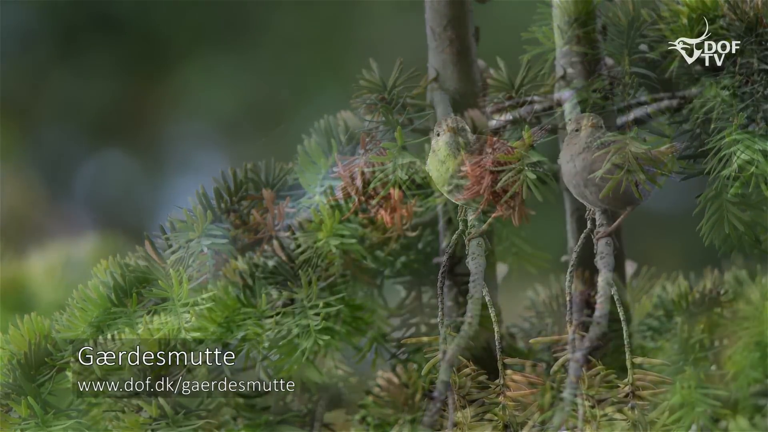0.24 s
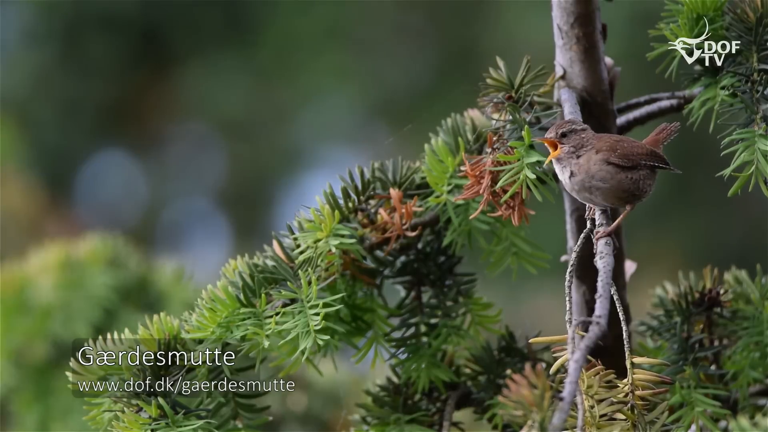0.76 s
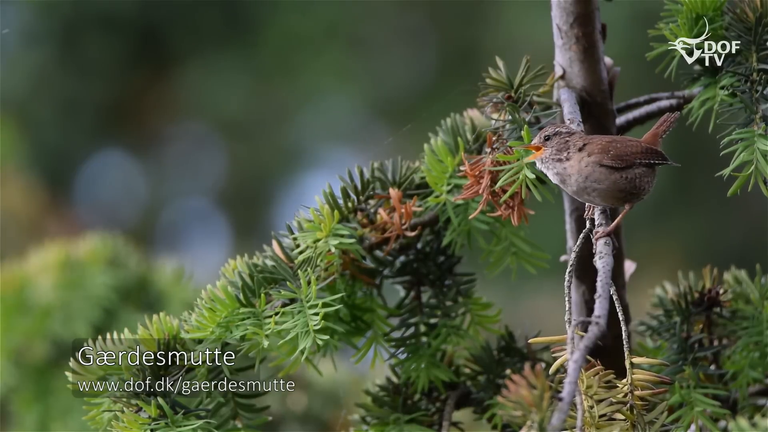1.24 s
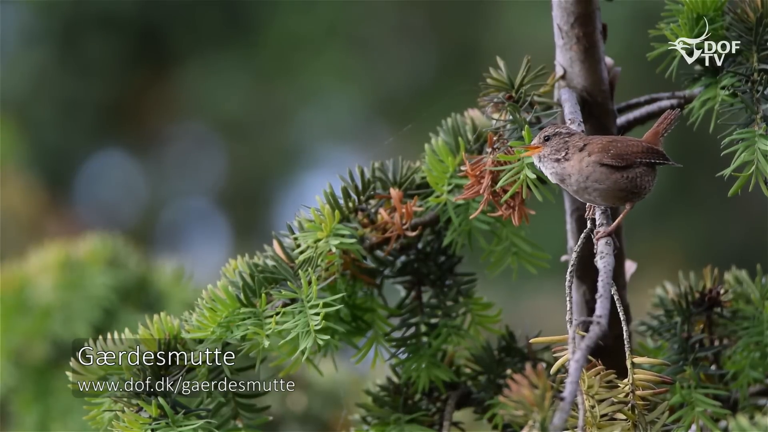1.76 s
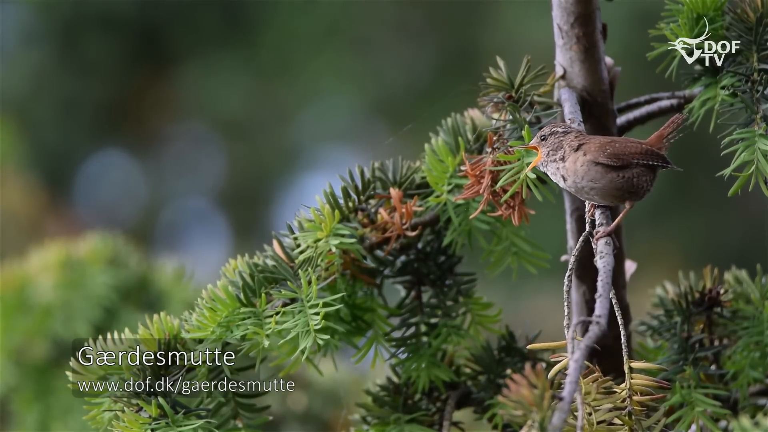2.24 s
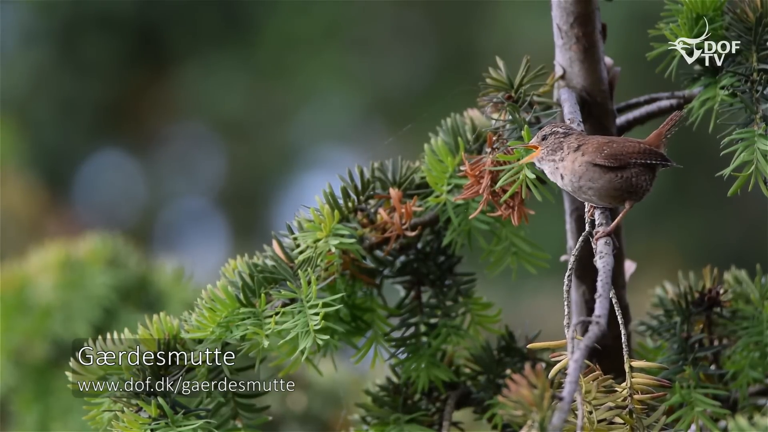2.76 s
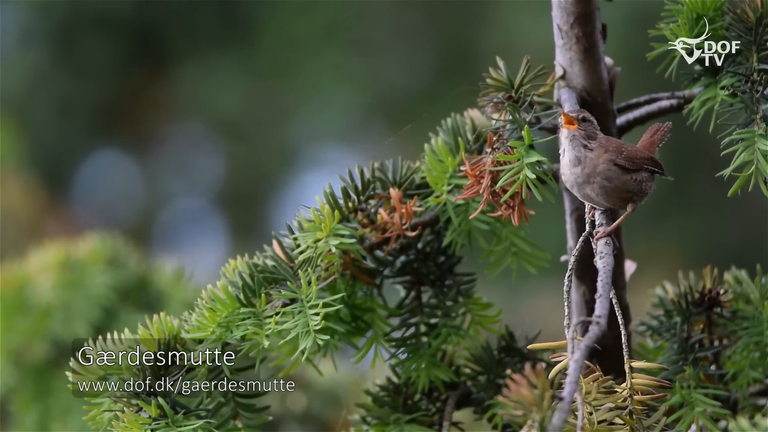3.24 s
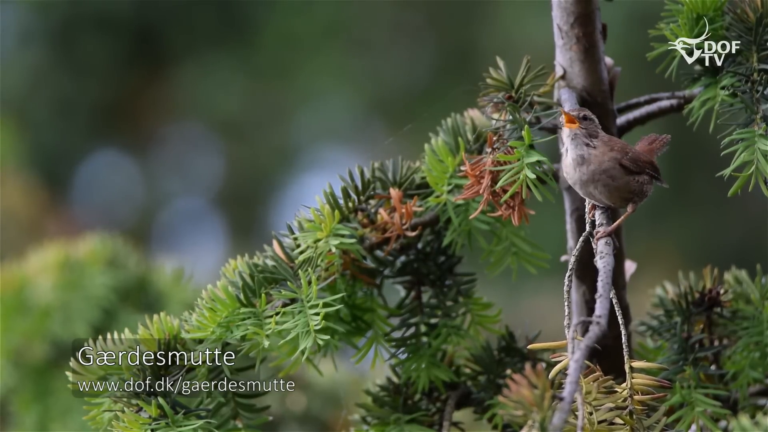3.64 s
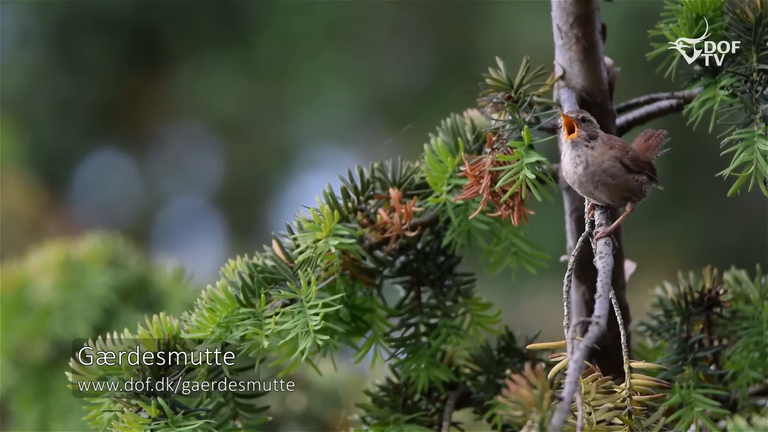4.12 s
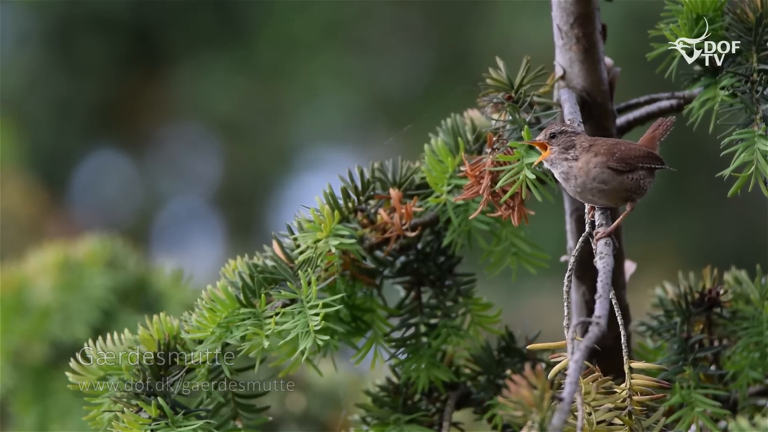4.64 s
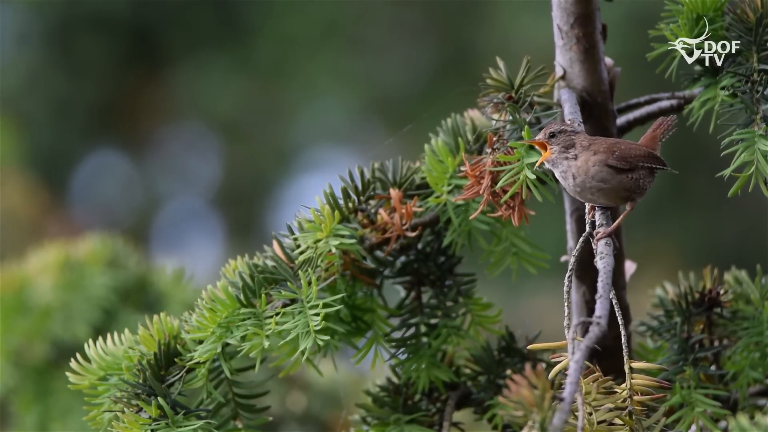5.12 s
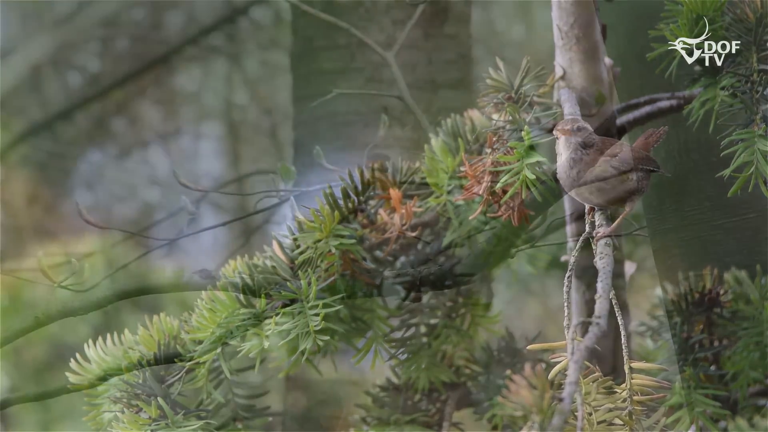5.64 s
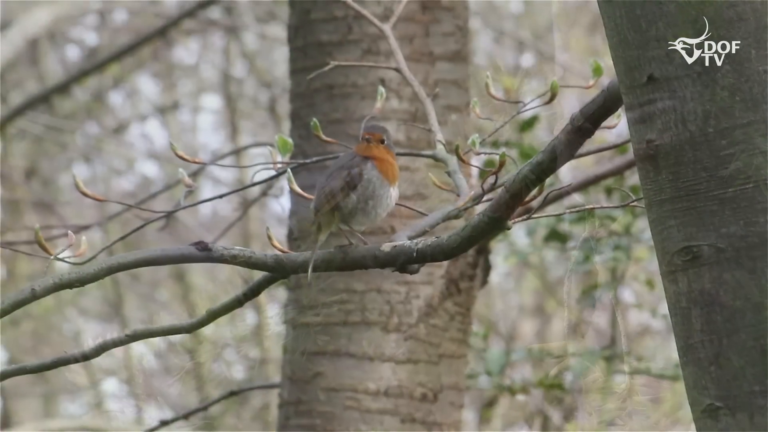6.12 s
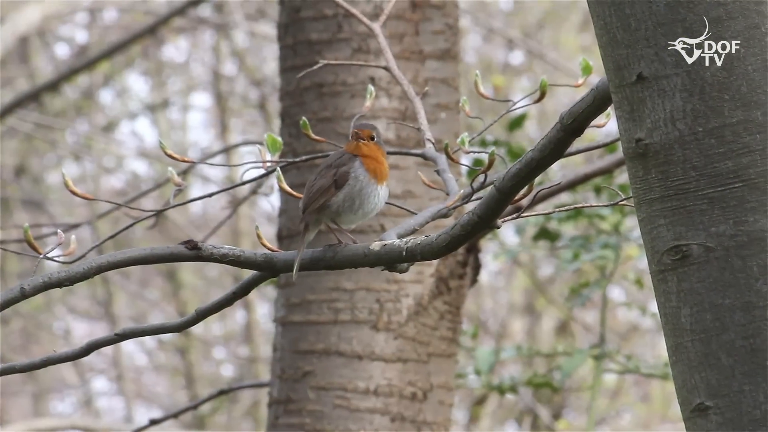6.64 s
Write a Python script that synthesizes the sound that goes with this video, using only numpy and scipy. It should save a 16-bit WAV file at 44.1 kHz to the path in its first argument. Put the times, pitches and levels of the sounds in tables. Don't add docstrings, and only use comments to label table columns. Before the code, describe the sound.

A wren sings loud, piercing whistles, trills and a dry buzz close by in woodland over steady traffic hiss, then a robin takes over.

```python
import sys
import numpy as np
from scipy import signal
from scipy.fft import rfft, irfft, next_fast_len
from scipy.io import wavfile
from scipy.ndimage import uniform_filter1d, minimum_filter1d, map_coordinates

SR = 44100
rng = np.random.default_rng(int(sys.argv[2]) if len(sys.argv) > 2 else 0)


def int16_out(signal):
    q = np.round(np.clip(np.atleast_2d(signal).T, -1, 1) * 32767)
    wavfile.write(sys.argv[1], SR, q.astype(np.int16))


def invert_db(level):
    return 10 ** (np.asarray(level, dtype=float) / 20)


N = 303408
TIME = np.arange(N) / SR

# pitch_hz, level_db (per Hz)
TRAFFIC = [(0, -27.5), (6, -28), (6.76, -33), (6.88, -36)]
TRAFFIC_COLOUR = [(20, -56.5), (50, -16), (140, -15.5), (330, -17), (440, -13.5), (560, -5.5), (900, -1.5),
                  (1700, -6.5), (2300, -13), (3100, -17.5), (4100, -23), (6200, -30.5), (8300, -34.5),
                  (12000, -40.5), (15500, -52.5)]
# pitch_hz, likeness (0 to 1)
ALIKE = [(60, 0.9), (160, 0.97), (420, 1), (1120, 0.98), (3000, 0.86), (8000, 0.39)]
# pitch_hz, level_db (per Hz)
WIND = [(0, -60.5), (3.2, -51.5), (5, -44), (6.05, -40.5), (6.6, -35), (6.88, -33)]
WIND_COLOUR = [(30, -12), (60, -16.5), (150, 0), (300, -3), (600, -7), (1200, -76)]
# pitch_hz, level_db (per Hz)
GUSTS = [(5.7, -70), (6.0, -43), (6.5, -36.5), (6.88, -36.5)]
GUST_COLOUR = [(30, -15), (70, 2.5), (120, -4), (250, -10.5), (500, -37.5)]
# pitch_hz, level_db (per Hz)
LAST_SONG = [(4300, -73), (4700, 5.5), (5800, -2.5), (6300, -60.5)]
# time_s, leaf_db, whine_db
SECOND_PLACE = [(5.5, -74.5, -100), (5.7, -47.5, -90), (5.95, -48.5, -62.5), (6.2, -50, -58.5),
                (6.5, -40, -41.5), (6.88, -28.5, -47)]
# pitch_hz, level_db (per Hz)
LEAF_COLOUR = [(1000, -28), (2500, -11), (6000, -6.5), (10000, -15), (15500, -28.5)]

# pitch_hz, level_db
THROAT = [(7000, -7.5), (8000, -4), (9500, -1), (12500, 1), (14500, -4)]
# time_s, left_minus_right_db
HEAD_TURN = [(.5, .3), (1.5, .9), (2.2, 2.3), (3, .3), (3.8, .5), (4.3, 3), (4.65, -.7), (5.2, -.7),
             (5.6, .6)]
# time_s, level_db
FACING = [(3.73, 0), (3.76, -3.5), (4.16, -4), (4.18, 0)]
# pitch_hz, fade_s (time to fall 60 dB)
FAR_WOOD = [(3000, 0.75), (5000, 0.58), (8000, 0.44), (14000, 0.27)]

# share_of_length, share_of_glide, level_db
HOLD = [(0, 0, -2), (.08, 0.47, -5), (.2, 0.74, -7), (.55, 0.67, -5), (.75, 0.92, -3), (1, 1, -12)]
DART = [(0, 0.05, -13.5), (.6, 0.86, 0.5), (1, 0.97, 3)]
SOAR = [(0, 4, -26), (.015, 2.7, -20), (.027, 1.28, -17), (.04, .64, -10), (.065, .2, -9), (.115, 0, -3),
        (.33, .3, -4), (.5, .5, 0), (.8, .92, -4), (1, 1, -6)]
PLUNGE = [(0, 0, -17), (.17, .15, -7), (.4, .46, 0), (.52, .65, -1), (.66, .83, -7), (1, 1, -9)]
SLIDE = [(0, 0, -8), (.12, .08, -1.5), (.33, .25, 0), (.67, .65, -1.5), (1, 1, -3)]
SAG = [(0, 0, -4), (.25, .56, 0), (.4, .6, -4), (.6, .64, -4), (1, 1, -12)]
BOW = [(0, .4, -15), (.25, .85, -8), (.42, 1, -6), (.7, .62, -3), (1, 0, 0)]
HOOK = [(0, .1, -20), (.09, 0, -6), (.16, .05, -2), (.36, .39, 0), (.65, .77, -4), (.8, .9, -8), (1, 1, -9)]
RISE = [(0, 0, -17), (.22, .2, -12), (.35, .36, -9), (.58, .6, -10), (.72, .76, -1), (.86, .9, -1),
        (1, 1, -5)]
FADE = [(0, 0, -22), (.11, .46, 0), (.3, .8, -4), (.37, .78, -12), (1, 1, -12)]
FALL = [(0, 0, -5), (.1, .12, -2), (.2, .28, -3), (.3, .45, -4), (.4, .6, -5), (.6, .74, -3), (.9, .93, 0),
        (1, 1, -3)]
STALL = [(0, 0, -5), (.17, .18, -1), (.26, .38, -4), (.35, .52, -6), (.45, .61, -5), (.7, .67, -7),
         (.86, .75, -3), (1, 1, -7)]
# start_s, length_s, first_hz, second_hz, level_db
HOLDS = [
    (.18, 0.051, 3740, 3540, -42),
    (0.31, .055, 8350, 8050, -57),
]
DARTS = [
    (0.429, 0.018, 4410, 5710, -33.5),
    (0.721, 0.03, 5970, 4970, -12.5),
    (1.176, 0.017, 3400, 3535, -20.5),
    (4.265, 0.038, 3155, 3410, -17.5),
]
SOARS = [
    (0.812, 0.26, 7836, 7064, -11.5),
]
PLUNGES = [
    (1.118, 0.019, 4830, 3910, -9),
    (1.64, .042, 5730, 3320, -7),
]
SLIDES = [
    (1.251, 0.066, 5283, 4530, -4.5),
    (4.604, 0.082, 5400, 4585, -6),
]
SAGS = [
    (1.41, 0.11, 5004, 4800, -7.5),
]
BOWS = [
    (1.542, 0.048, 3430, 3770, -14),
    (1.847, 0.022, 3160, 3340, -21.5),
    (2.656, 0.025, 3500, 3790, -13),
]
HOOKS = [
    (1.729, 0.083, 7350, 4610, -6.5),
]
RISES = [
    (2.97, .051, 3284, 4117, -5),
    (3.064, .056, 3286, 4120, -5.5),
    (3.156, 0.051, 3250, 4093, -7),
    (3.246, .056, 3283, 3983, -7),
    (3.343, 0.054, 3277, 4090, -6.5),
]
FADES = [
    (3.45, 0.16, 6140, 5630, -4),
]
FALLS = [
    (4.746, .051, 6130, 4855, -4.5),
    (4.867, .049, 5930, 4810, -4),
    (4.981, .049, 5940, 4830, -4.5),
    (5.097, .053, 5920, 4850, -4),
    (5.324, 0.055, 5920, 4810, -5.5),
    (5.556, .051, 5860, 4875, -5),
]
STALLS = [
    (5.21, 0.063, 5920, 4760, -4.5),
    (5.439, 0.063, 5980, 4610, -5),
]
# time_s, pitch_hz, level_db
SOLOS = [
    [(.499, 6400, -45), (.512, 7080, -43), (.519, 6920, -34), (.525, 6500, -24), (.532, 6520, -23)],
    [(.578, 4650, -34), (.59, 4490, -25.5), (.62, 4460, -21), (.635, 4390, -25.5)],
    [(.665, 4500, -31), (.68, 4445, -28), (.705, 4470, -34)],
    [(2.729, 4630, -27.5), (2.745, 4490, -13), (2.765, 4410, -0.5), (2.776, 4340, -10.5),
     (2.787, 4337, -10), (2.826, 4115, -10.5)],
    [(2.868, 6800, -25), (2.875, 7520, -8.5), (2.884, 8110, -6), (2.89, 8320, -7), (2.9, 7820, -9),
     (2.912, 7190, -6.5), (2.917, 7390, -5.5)],
    [(3.632, 4850, -25), (3.655, 4700, -14), (3.668, 4614, -2.5), (3.688, 4434, -2), (3.7, 4210, -9.5),
     (3.724, 4010, -5.5)],
    [(4.181, 6460, -13), (4.19, 7190, -4.5), (4.197, 7380, -14.5), (4.21, 6900, -7.5), (4.222, 6530, -10.5),
     (4.232, 6320, -5)],
    [(4.357, 8760, -17.5), (4.366, 8300, -10), (4.378, 8175, -5.5), (4.425, 8180, -13), (4.465, 8074, -6.5),
     (4.53, 8080, -9), (4.555, 8050, -23.5)],
]
# time_s, pitch_hz, level_db
FAR_BIRD = [
    [(.565, 4060, -43), (.64, 3850, -41)],
    [(.67, 3730, -37), (.685, 3620, -37)],
    [(4.43, 5130, -49), (4.5, 5000, -45), (4.58, 4980, -49)],
]
# time_s (from the start of each), pitch_hz, level_db
FLICK = [(0.0, 3880, -36.5), (0.004, 4910, -15), (0.009, 5360, -14)]
PIPE = [(0, 6400, -14), (.008, 6450, -10), (.024, 6370, -10), (.04, 6210, -12), (.056, 6130, -9),
        (.073, 6100, -9)]
GRACE = [(-.016, 5850, -24), (-.011, 5900, -22)]
BUZZ = [(-.0004, 7700, -21), (.0008, 6950, -12), (.0022, 5950, -12.5), (.0038, 5000, -17),
        (.0048, 4500, -25)]
# start_s, level_change_db
FLICKS = [(1.894, 0), (2.0202, 0.5), (2.149, 1), (2.2747, 0), (2.398, 1), (2.524, 0.5)]
PIPES = [(1.913, 1), (2.0449, -0.24), (2.1687, -1.3), (2.299, -1.4), (2.4202, 0), (2.5463, -2)]
BUZZES = [(3.7605, -2.5), (3.7886, 0), (3.8202, 0), (3.8477, 0), (3.8762, 1), (3.905, 0.5), (3.9345, 0.5),
          (3.9643, 0), (3.994, 1.5), (4.023, 0.5), (4.051, 2), (4.0822, -1), (4.1115, -1.5), (4.14, 0)]

# start_s, knock_db, snap_db
TICKS = [(.397, -47, 4), (6.109, -30, -7), (6.119, -33, -8), (6.1307, -27.5, -8.5), (6.2532, -25.5, -24),
         (6.2682, -35.5, -1), (6.273, -32, -1), (6.2769, -16, -23), (6.294, -27.5, -7), (6.303, -35.5, -3),
         (6.34, -37.5, -4), (6.34, -37, -5), (6.353, -30, -3.5), (6.401, -36.5, 2.5), (6.404, -32, -8.5),
         (6.414, -28.5, -8.5), (6.4144, -44.5, -4), (6.45, -34.5, -9), (6.464, -29.5, -4),
         (6.3057, -47, -19), (6.335, -16, -11.5), (6.35, -20, -27.5), (6.3564, -17.5, -52),
         (6.4073, -21, -20), (6.41, -16, -14), (6.4247, -28.5, -5.5), (6.4296, -8, -24), (6.4372, -12, -22),
         (6.4577, -19, -31), (6.494, -16.5, -38), (6.6003, -19, -31), (6.6624, -13.5, -10),
         (6.673, -16, -32.5), (6.6794, -18.5, -5), (6.686, -8.5, -15), (6.7715, 1.5, -18),
         (6.784, -12.5, -29.5), (6.794, -15.5, -4), (6.792, -21, -27), (6.797, -11.5, -9),
         (6.7987, -9, -10.5), (6.802, -14.5, -17), (6.8053, -5.5, -20), (6.8089, -14, 1)]
# start_s, pitch_hz, peak_db
BILL = [
    (0.813, 7880, -24),
    (1.255, 7000, -9),
    (1.523, 2820, -1),
    (1.5243, 6480, -18),
]
# start_s, peak_db
THUMP = [
    (6.207, -12),
]

# share_of_length, share_of_glide, level_db
SWELL = [(0, 0, -3), (.45, 0.4, -1), (1, 1, -2.5)]
BULGE = [(0, 0, -10.5), (.35, 0.45, -2), (.7, .75, -3.5), (1, 1, -12.5)]
UPPER = [(0, 0, -30), (.045, .45, -24), (.105, .83, -17), (.195, .99, -9), (.42, 1.015, -7),
         (.65, .995, -1), (.86, 1, -1), (.9, .97, -7), (1, .96, -8)]
LOWER = [(0, 0.29, -25.5), (.18, 0.072, -8.5), (.43, 0.081, -1.5), (.58, 0.5, -3.5), (.87, .93, 4),
         (1, 0.84, -11)]
# start_s, length_s, first_hz, second_hz, level_db
CHIPS = [(6.178, 0.0088, 4120, 4020, -32.5), (6.191, 0.013, 3680, 3670, -35),
         (6.203, 0.0051, 4090, 4100, -43), (6.22, 0.006, 3860, 3980, -35.5),
         (6.228, 0.0039, 4210, 4250, -37), (6.24, 0.009, 3970, 4040, -35), (6.284, 0.0071, 4150, 4100, -37),
         (6.297, .006, 4180, 4310, -36), (6.318, 0.021, 4300, 4200, -28.5),
         (6.338, 0.0065, 4150, 4170, -39), (6.483, 0.0055, 6180, 6180, -25.5)]
PIPS = [
    (6.468, 0.0081, 4760, 5650, -27),
    (6.475, .005, 5670, 5750, -24.5),
    (6.509, 0.0065, 7500, 7610, -29),
    (6.518, .006, 7700, 7590, -22),
    (6.527, 0.0062, 7480, 7430, -22),
]
WARBLE = [(6.494, 0.017, 6480, 6360, -18), (6.509, .011, 6500, 6460, -15.5), (6.521, .022, 6510, 6200, -6),
          (6.541, 0.01, 6370, 6100, -15.5), (6.55, 0.012, 6340, 6170, -6), (6.559, 0.015, 6210, 6020, -8.5),
          (6.573, 0.015, 6360, 6170, -8), (6.59, 0.012, 6340, 6150, -21.5)]
REEDY = [
    (6.478, .032, 3710, 3790, -20),
    (6.513, .007, 3790, 3770, -23),
    (6.523, .01, 3790, 3740, -24),
    (6.537, .06, 3780, 3750, -39),
]
UPPERS = [
    (6.613, .135, 5270, 6780, -1.5),
    (6.798, .1, 5880, 6794, -1),
]
LOWERS = [
    (6.629, .12, 6460, 5910, -7),
    (6.804, .085, 6180, 5880, -8),
]
# time_s, upper_db, lower_db
CATCHES = [(6.65, 0, -8), (6.666, 0, -8), (6.69, -2, -10), (6.706, 0, -12), (6.739, -8, -9),
           (6.746, -4, -4), (6.82, 0, -8), (6.838, -1, -8)]
SHAKE_HZ = [25, 100]
# time_s, level_db
COUPLING = [(6.48, -39.5), (6.497, -20), (6.533, -23), (6.545, -45.5), (6.63, -41.5), (6.7, -39),
            (6.72, -24), (6.8, -40), (6.88, -27.5)]


def unit(x):
    return x / np.sqrt(np.mean(x ** 2) + 1e-20)


def along(points, hz):
    f, v = np.transpose(points)
    return np.interp(np.log(hz + 1), np.log(f + 1), v)


def curves(rows):
    s, *cols = np.transpose(rows)
    return [np.interp(TIME, s, c) for c in cols]


def wobble(rate):
    return map_coordinates(rng.standard_normal(int(N * rate / SR) + 4), [TIME * rate])


def filtered(x, response):
    m = next_fast_len(N + 8192)
    return irfft(rfft(x, m) * response(np.fft.rfftfreq(m, 1 / SR)), m)[..., :N]


def rush(spectrum, alike):
    def response(hz):
        turn = np.arccos(np.clip(along(alike, hz), -1, 1)) / 2
        return invert_db(along(spectrum, hz)) * [np.cos(turn), np.sin(turn)]

    mid, side = filtered(rng.standard_normal((2, N)), response)
    return unit(np.array([mid + side, mid - side]))


def background():
    traffic = invert_db(curves(TRAFFIC)[0] + 1.32 + 0.35 * wobble(3.14)) * rush(TRAFFIC_COLOUR, ALIKE)
    wind = invert_db(curves(WIND)[0] + 3.0 + wobble(5.8)) * rush(WIND_COLOUR, [(100, 1.0)])
    wind += invert_db(curves(GUSTS)[0] + 3 * wobble(14)) * rush(GUST_COLOUR, [(100, 1.0)])
    echo = invert_db(-43.5 - 60 * TIME / 0.78) * rush(LAST_SONG, [(5000, .8)])
    leaf_db, whine_db = curves(SECOND_PLACE)
    leaves = invert_db(leaf_db + 2.5 * wobble(60)) * rush(LEAF_COLOUR, [(3000, 1.0)])
    whine_hz = 15703
    whine = invert_db(whine_db + 0.66 * wobble(30)) * np.sin(2 * np.pi * whine_hz * TIME)
    return traffic + wind + echo + leaves + whine


def sung(shape, rows):
    return [[(s + at * length, first + way * (second - first), db + change) for at, way, change in shape]
            for s, length, first, second, db in rows]


def trill(shape, repeats):
    bend = 1 + .004 * rng.standard_normal((len(repeats), len(shape)))
    return [[(s + at, hz * b, db + change) for (s, hz, db), b in zip(shape, row)]
            for (at, change), row in zip(repeats, bend)]


def whistle(notes, second_db, third_db, edge=.0025, round_s=.003, shake_hz=0):
    out = np.zeros(N + SR)
    flicker = invert_db(3 * wobble(90))
    shake = shake_hz * wobble(110)
    for note in notes:
        s, hz, db = np.transpose(note)
        t = np.arange(s[0] - edge, s[-1] + edge, 1 / SR)
        glide = np.interp(t, s, hz)
        size = 1 + int(min(round_s, (s[-1] - s[0]) / 4) * SR)
        pitch = uniform_filter1d(glide, size, mode="nearest") + np.interp(t, TIME, shake)
        phase = 2 * np.pi * np.cumsum(pitch) / SR
        to_end = np.minimum(t - t[0], t[-1] - t)
        gate = np.sin(np.pi / 2 * np.clip(to_end / (2 * edge), 0, 1)) ** 2
        over = invert_db(second_db + along(THROAT, 2 * glide)) * np.sin(2 * phase)
        over = over + invert_db(third_db) * np.sin(3 * phase) * (glide < SR / 6)
        tone = np.sin(phase) + over * np.interp(t, TIME, flicker)
        out[round(t[0] * SR):][:len(t)] += gate * np.interp(t, s, invert_db(db)) * tone
    return out[:N]


def wren():
    singles = sung(DART, DARTS) + sung(SLIDE, SLIDES) + sung(HOLD, HOLDS) + SOLOS + sung(HOOK, HOOKS)
    singles += sung(PLUNGE, PLUNGES) + sung(BOW, BOWS) + sung(FADE, FADES) + sung(SAG, SAGS)
    singles += sung(SOAR, SOARS) + sung(RISE, RISES) + sung(FALL, FALLS) + sung(STALL, STALLS)
    graces = trill(GRACE, [(row[0], 0) for row in FALLS[1:] + STALLS])
    trills = trill(FLICK, FLICKS) + trill(PIPE, PIPES) + graces
    buzz = whistle(trill(BUZZ, BUZZES), second_db=-31.5, third_db=-63.5, edge=0.00086)
    song = whistle(singles + trills + FAR_BIRD, second_db=-35.5, third_db=-45.0, shake_hz=14)
    return song * invert_db(1.3 * wobble(130)) + buzz


def trees(x, near_db, far_db, near_t60, count=4):
    spread = 0.35
    slope_s, slope_db = .316, -55
    t = np.arange(int(.7 * SR)) / SR
    out = np.zeros((2, N))
    for k in range(count):
        near = rng.standard_normal((2, len(t))) * invert_db(-60 * t / near_t60) * np.clip(t / .009, 0, 1)
        near = near * invert_db(4 * wobble(200)[:len(t)])
        hz, frames, z = signal.stft(rng.standard_normal((2, len(t))), SR, nperseg=256)
        fading = z * invert_db(-60 * frames / along(FAR_WOOD, hz)[:, None])
        far = signal.istft(fading, SR, nperseg=256)[1][:, :len(t)]
        near = invert_db(near_db) * near / np.linalg.norm(near[0])
        far = invert_db(far_db) * far / np.linalg.norm(far[0])
        mid, side = near + far
        blur = np.exp(-((t - slope_s) / .003) ** 2) / 2
        mid += invert_db(slope_db) * rng.standard_normal(len(t)) * blur
        share = np.clip(1 - np.abs((TIME * 5 - k) % count - 1), 0, 1)
        paths = [mid + spread * side, mid - spread * side]
        out += signal.fftconvolve((share * x)[None], paths, axes=1)[:, :N]
    return out


def twigs():
    out, t = np.zeros(N + SR), np.arange(SR // 50) / SR
    for s, db, snap_db in TICKS:
        knock_hz = rng.uniform(2500, 4200)
        knock = invert_db(db + 9.0 - 60 * t / 0.0013) * np.sin(2 * np.pi * knock_hz * t)
        snap = invert_db(db + snap_db + 14.5 - 60 * t / 0.006) * rng.standard_normal(len(t))
        out[round(s * SR):][:len(t)] += knock + snap
    out = np.pad(filtered(out[:N], lambda hz: 1 / (1 + (1900 / (hz + 1)) ** 6)), (0, SR))
    for s, hz, db in BILL:
        ring = invert_db(db - 60 * t / 0.0035) * (1 - np.exp(-t / 0.00029))
        out[round(s * SR):][:len(t)] += ring * np.sin(2 * np.pi * hz * t)
    for s, db in THUMP:
        out[round(s * SR):][:len(t)] -= invert_db(db + 4 - 60 * t / .014) * np.sin(2 * np.pi * 330 * t)
    return filtered(out[:N], lambda hz: 1 / (1 + (hz / 11000) ** 3))


def robin():
    s, *catch_db = np.transpose(CATCHES)
    catch_s = .003
    falter = invert_db(np.array(catch_db) @ np.exp(-((TIME - s[:, None]) / catch_s) ** 2))
    upper_notes = sung(UPPER, UPPERS) + sung(SWELL, CHIPS + PIPS) + sung(BULGE, WARBLE)
    sides = [upper_notes, sung(LOWER, LOWERS)]
    upper, lower = (gain * whistle(notes, second_db=-30, third_db=-69.5, edge=0.00075, shake_hz=hz)
                    for gain, notes, hz in zip(falter, sides, SHAKE_HZ))
    lower = lower * invert_db(3.5 * np.clip(wobble(130), -3, .5))
    both = upper + lower + whistle(sung(SWELL, REEDY), second_db=-9.5, third_db=-17.5, edge=0.0011)
    both = both * invert_db(1.5 * wobble(120))
    size = np.sqrt(np.abs(uniform_filter1d(both ** 2, size=400))) + 1e-3
    mixed = size * (1.0 * (both / size) ** 2 + 3.0 * (both / size) ** 3)
    sum_tone = filtered(upper * lower / size ** 0.81, lambda hz: hz > 9000)
    both = both + invert_db(-23) * sum_tone
    return invert_db(.5) * both + invert_db(curves(COUPLING)[0]) * filtered(mixed, lambda hz: hz > 4600)


def held(x):
    ceiling = .93
    need = np.minimum(1, ceiling / (np.abs(x).max(0) + 1e-9))
    return x * uniform_filter1d(minimum_filter1d(need, size=301), size=151)


def scene():
    near, second, pan_db = wren(), robin() + twigs(), curves(HEAD_TURN)[0]
    direct = invert_db(-0.5) * near * invert_db(np.array([pan_db / 2, -pan_db / 2]))
    scattered = filtered(near, lambda hz: .6 + .4 / (1 + (hz / 9500) ** 12))
    wren_echo = trees(scattered * invert_db(curves(FACING)[0]), near_db=-5.0, far_db=-10.5, near_t60=0.23)
    robin_echo = trees(second, near_db=-26.5, far_db=-24.0, near_t60=0.28, count=2)
    return held(direct + wren_echo) + second + robin_echo + background()


def masked(x, depth_db, spread_db, from_hz):
    hz, _, z = signal.stft(x, SR, nperseg=1024)
    power = np.abs(z.mean(0)) ** 2
    band = np.repeat(power[:512].reshape(32, 16, -1).mean(1), 16, axis=0)
    band_hz, peak_hz = hz[:512, None], hz[power.argmax(0)]
    away_khz = np.abs(band_hz - peak_hz) / 1000
    away_khz *= np.where(band_hz > peak_hz, .9, 1)
    peak = power.max(0)
    loudest = np.maximum(peak, .3 * uniform_filter1d(peak, size=7, origin=3))
    floor = loudest * invert_db(2 * (depth_db - spread_db * away_khz))
    keep = (band > floor) | (band_hz < from_hz)
    return signal.istft(z * np.vstack([keep, keep[-1:]]), SR, nperseg=1024)[1][:, :N]


def low_pass(x):
    return signal.sosfilt(signal.butter(12, 15950, fs=SR, output="sos"), x)


def record(dry):
    x = masked(dry, depth_db=-48.5, spread_db=3, from_hz=5800)
    mix = np.clip(x - .016, -1, 1)
    return low_pass(mix)


dry = scene()
out = record(dry)
int16_out(out)
```